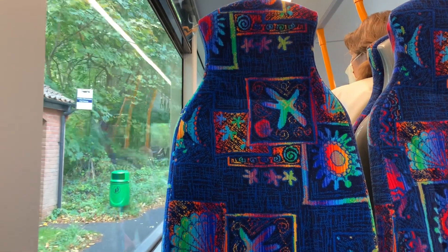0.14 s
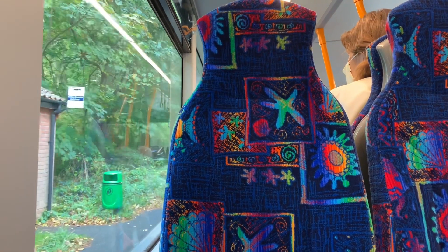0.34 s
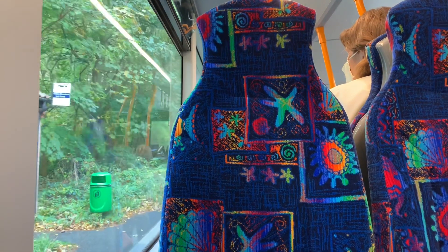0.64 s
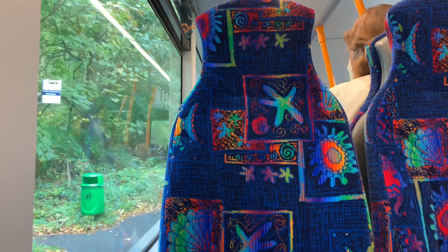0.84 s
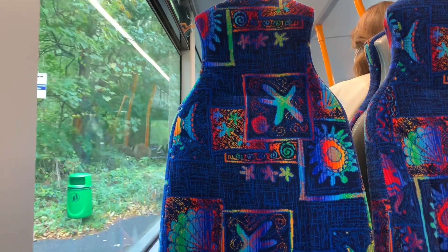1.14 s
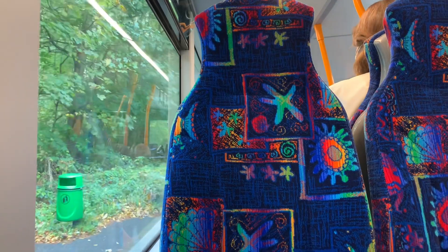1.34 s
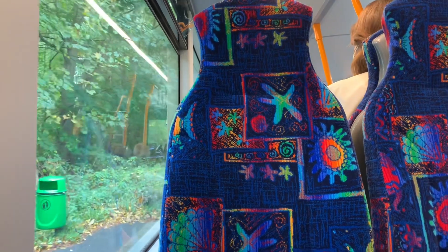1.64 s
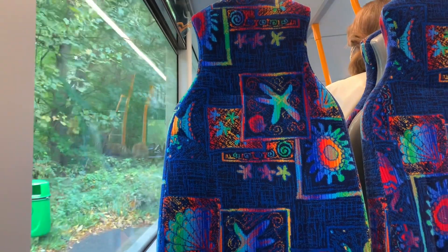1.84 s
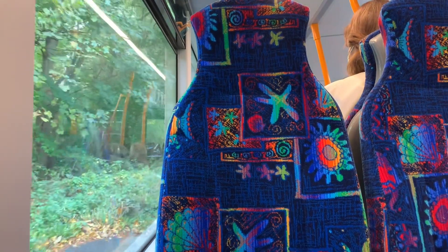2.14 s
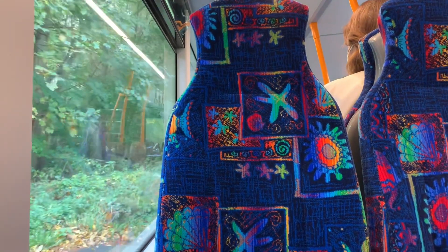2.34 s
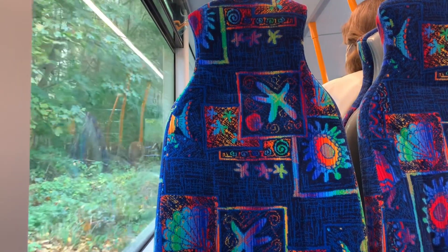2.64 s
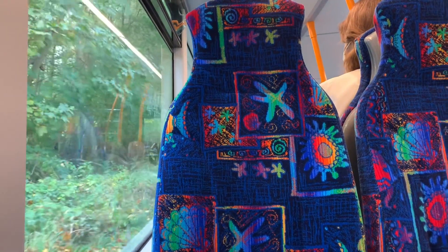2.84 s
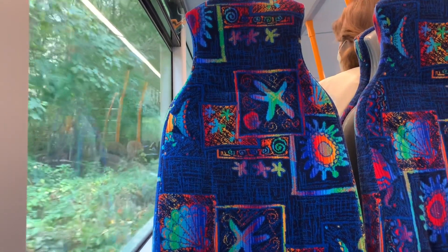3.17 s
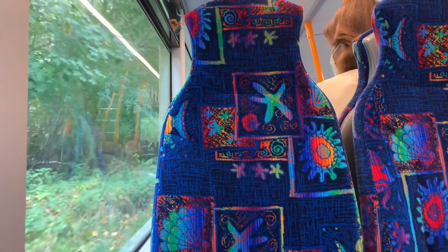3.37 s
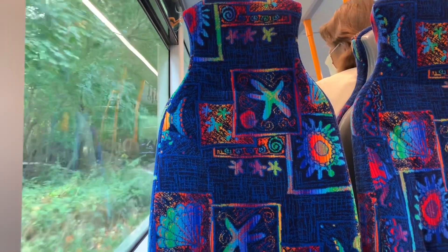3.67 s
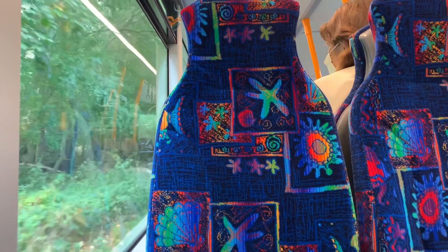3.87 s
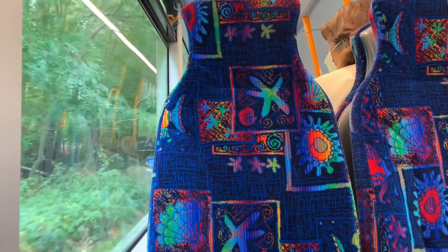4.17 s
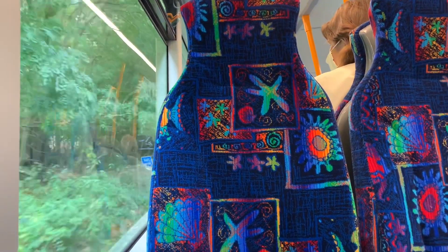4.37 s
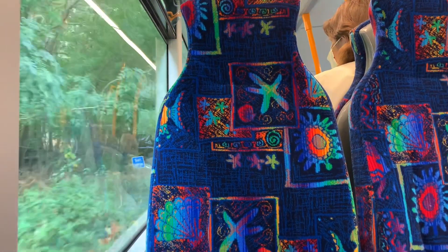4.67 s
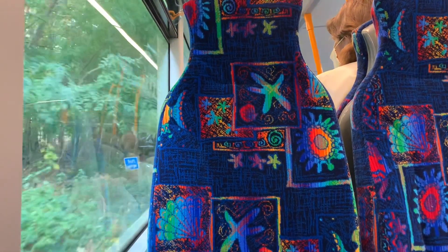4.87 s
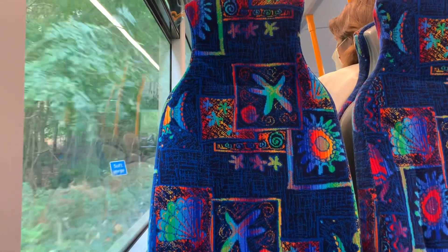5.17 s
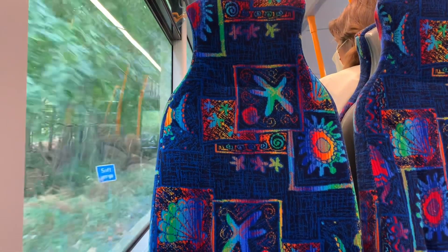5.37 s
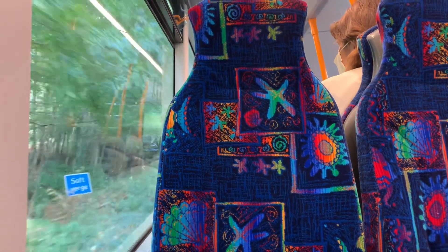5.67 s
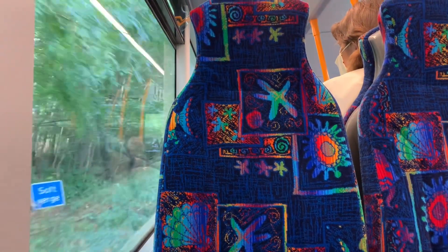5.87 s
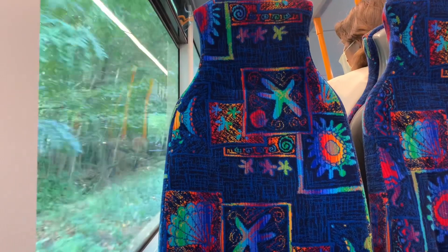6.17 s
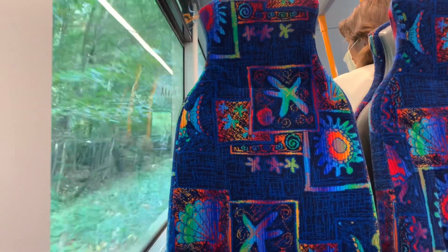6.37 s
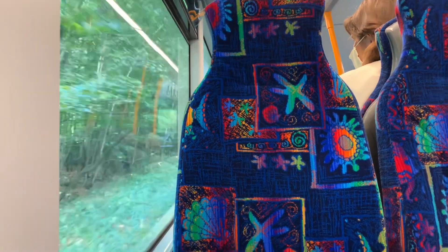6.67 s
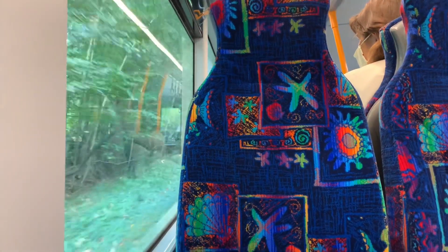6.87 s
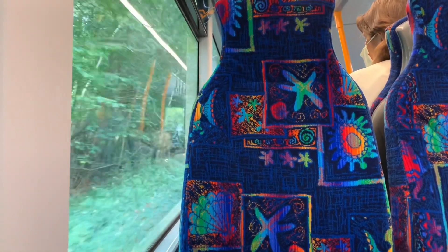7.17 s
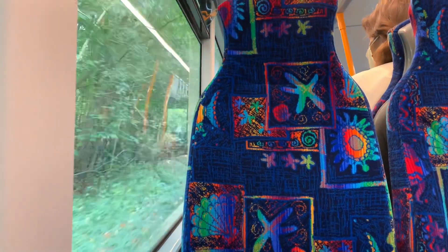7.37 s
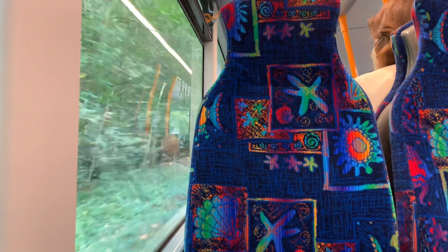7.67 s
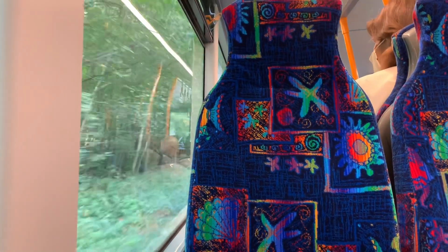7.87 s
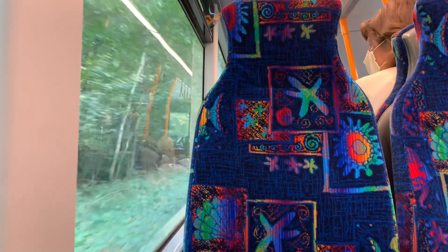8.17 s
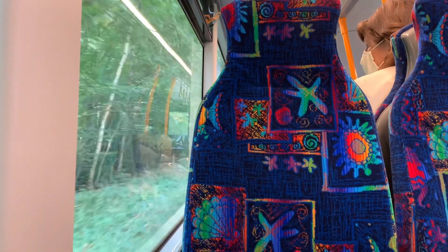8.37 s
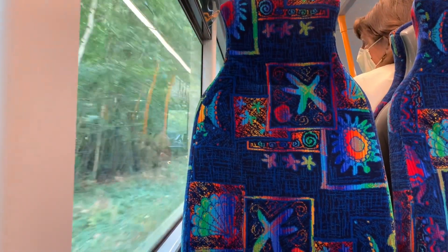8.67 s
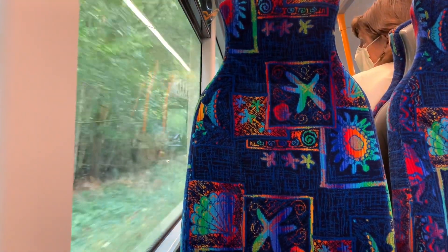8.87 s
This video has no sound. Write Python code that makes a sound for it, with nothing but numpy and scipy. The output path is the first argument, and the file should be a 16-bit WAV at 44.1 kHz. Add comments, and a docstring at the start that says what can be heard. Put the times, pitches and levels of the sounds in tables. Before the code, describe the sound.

Heard from a seat inside a bus pulling away along a wooded road. A deep diesel throb dominates, climbing for three seconds, sagging at a gear change, then rising and dipping twice more. Body rumble and soft block clatter surround it, while loose trim ticks and rattles. Faint air hiss, fan whine and a thin belt squeal sit on top; gear whine joins later. Close stereo microphone in the cabin.

```python
"""A low diesel throb, body rumble and block clatter fill a bus cabin as it pulls away and changes up.
Firing and shaft orders are drifting sines; rumble, tyre roar, clatter and air hiss are shaped noise,
the high hiss puffing with the crankshaft. A fan motor whines and narrow squeaks flare from the start;
trim rattles (noise bursts and struck modes), floor notes, a belt squeal and a creak join in,
then axle and gearbox whine as wavering sines."""
import sys
import numpy as np
from scipy import signal
from scipy.fft import rfft, irfft
from scipy.io import wavfile
from scipy.ndimage import uniform_filter1d

SR = 44100
rng = np.random.default_rng(int(sys.argv[2]) if len(sys.argv) > 2 else 0)


def store_wav(level_fs):
    """Save 16-bit WAV to argv[1]."""
    pcm = np.round(np.clip(np.atleast_2d(level_fs), -1, 1) * 32767)
    wavfile.write(sys.argv[1], SR, pcm.T.astype(np.int16))


N = 397782


def from_db(db):
    """Decibels to gain."""
    return 10 ** (np.asarray(db) / 20)


def rms_one(x):
    """Scale to unit rms."""
    return x / np.sqrt(np.mean(x ** 2) + 1e-20)


def in_time(rows):
    """Columns of a table as curves, one value a sample; the time column is left out."""
    s, *columns = np.transpose(rows)
    return [np.interp(np.arange(N) / SR, s, c) for c in columns]


def during(rows, fade_s=0.063):
    """1 while a table lasts, fading to 0 beyond both ends."""
    t = np.arange(N) / SR
    inside_s = np.minimum(t - rows[0][0], rows[-1][0] - t)
    return np.clip(1 + inside_s / fade_s, 0, 1)


def at_hz(points, hz):
    """A spectrum read on a log-frequency axis."""
    table_hz, level = np.array(points).T
    return np.interp(np.log(hz), np.log(table_hz), level)


def drift(rate_hz):
    """Slow random wander of unit rms: noise through two equal low-pass poles."""
    step = 40   # drawn at every 40th sample, then joined by lines
    r = np.exp(-2 * np.pi * rate_hz * step / SR)
    noise = rng.standard_normal(N // step + 2002)
    slow = signal.lfilter([1], [1, -2 * r, r * r], noise)[2000:]
    return np.interp(np.arange(N) / step, np.arange(len(slow)), rms_one(slow))


def resonate(x, modes):
    """Parallel resonances of (pitch_hz, width_hz, level_db), signs alternating."""
    out = 0
    for k, (hz, width_hz, level_db) in enumerate(modes):
        r = np.exp(-np.pi * width_hz / SR)
        top = (1 - r * r) / 2 * np.array([1, 0, -1])
        bottom = [1, -2 * r * np.cos(2 * np.pi * hz / SR), r * r]
        out = out + (-1) ** k * from_db(level_db) * signal.lfilter(top, bottom, x)
    return out


def cabin_modes(ripple_db, spacing_hz):
    """The many overlapping modes of the cabin: a fine, uneven ripple over frequency."""
    hz = np.fft.rfftfreq(N, 1 / SR)
    heights = rng.standard_normal(3000)
    return from_db(ripple_db * np.interp(hz / spacing_hz, np.arange(len(heights)), heights))


def coloured(spectrum, likeness, patchy_db):
    """Stereo noise of a given spectrum and likeness, flickering band by band; rms 1."""
    hz = np.maximum(np.fft.rfftfreq(N, 1 / SR), 1)
    alike = np.clip(at_hz(likeness, hz), 0, 1)
    mid, side = rfft(rng.standard_normal((2, N))) * cabin_modes(ripple_db=1.3, spacing_hz=25)
    pair = np.sqrt(1 + alike) * mid + np.sqrt(1 - alike) * side * [[1], [-1]]
    pair = from_db(at_hz(spectrum, hz)) * pair
    edges = np.log(np.geomspace(spectrum[0][0], spectrum[-1][0], num=6))
    out = 0
    for k in range(len(edges)):
        # overlapping triangular bands, each with its own flicker
        share = np.interp(np.log(hz), edges, np.arange(len(edges)) == k, left=0, right=0)
        out = out + from_db(patchy_db * drift(13.1)) * irfft(pair * share, N)
    return rms_one(out)


def orders(turns, multiples, levels_db, waver_db, waver_hz):
    """Sines at multiples of a rotation, each swelling on its own."""
    out = 0
    for k, level_db in zip(multiples, levels_db):
        sine = np.sin(2 * np.pi * (k * turns + rng.random()))
        out = out + np.sqrt(2) * from_db(level_db + waver_db * drift(waver_hz)) * sine
    return out


def whine(rows, waver_db, pitch_waver_hz, level_rate_hz):
    """A meshing, rotating or humming part: one sine whose pitch and level waver."""
    hz, level_db = in_time(rows)
    turns = np.cumsum(hz + pitch_waver_hz * drift(5.76)) / SR
    gain = from_db(level_db + 2.0 + waver_db * drift(level_rate_hz))
    return during(rows) * gain * np.sin(2 * np.pi * turns)


# Engine speed through the gear changes: time_s [s], firing_rate [firings per s]
ENGINE_SPEED = [(0, 37.5), (.6, 33.4), (1, 35.5), (1.5, 36), (1.85, 40.3), (2.08, 46.2), (2.25, 46.2),
                (3, 57), (3.25, 58.8), (3.5, 54.8), (3.9, 46.6), (4.25, 44.4), (4.75, 45.8), (5.25, 51.1),
                (5.5, 50.1), (6, 45.6), (6.25, 44.3), (7, 49.4), (8, 55.1), (8.3, 56.6), (8.5, 53.3),
                (9.02, 42.5)]


def engine_speed():
    """Firings per second, changes of speed rounded off by the flywheel."""
    flywheel_s = .15
    return uniform_filter1d(in_time(ENGINE_SPEED)[0], size=round(flywheel_s * SR), mode="nearest")


# Auxiliary shaft spinning up behind a slipping coupling: time_s [s], shaft_rate [turns per s]
SHAFT_SPIN_UP = [(0, 9), (.75, 11.6), (1, 13), (1.25, 16.2), (2.5, 27.2), (3, 31), (3.5, 33.1)]
SHAFT_RATIO = .543   # shaft turns per firing once the coupling has caught up


def shaft_speed():
    """Turns per second: the shaft spins up, then locks to the engine."""
    return np.minimum(in_time(SHAFT_SPIN_UP)[0], SHAFT_RATIO * engine_speed())


# How hard the body shakes: time_s [s], level_db [relative dB]
SHAKING_LEVEL = [(0, -18.5), (.4, -20.5), (1.6, -17.5), (2, -14), (3.1, -14), (4.5, -14.5), (5.3, -15),
                 (6.8, -16.5), (7.9, -14), (9.02, -13.5)]


def shaking_level():
    """The body's shaking in dB, shared by rumble, floor and engine orders."""
    return in_time(SHAKING_LEVEL)[0]


# Rumble spectrum: pitch_hz [Hz], level_db [relative dB per Hz]
RUMBLE_SPECTRUM = [(15, -8), (28, -12), (42, -12), (62, -11), (81, -9.5), (115, -10.5), (140, -11),
                   (185, -16), (225, -19), (270, -19), (324, -28), (400, -42), (840, -120)]
# How alike left and right hear the body: pitch_hz [Hz], likeness [0 to 1]
LEFT_RIGHT_LIKENESS = [(30, 0.78), (55, 0.95), (90, 0.92), (130, 0.8), (200, 0.72), (400, 0.48),
                       (900, 0.36), (1300, 0.5), (1700, 0.6), (2000, 0.5), (2450, 0.5), (3500, 0.35),
                       (6000, 0.25)]
# Before the wheels roll, a gain at the first mode and a lack at the second:
# pitch_hz [Hz], width_hz [Hz], level_db [dB]
STANDSTILL_MODES = [(210, 83, 1), (120, 92, -4)]


def road_rumble():
    """Low shaped noise follows the shaking; its standstill colour fades as the bus gets rolling."""
    rolling_s = 2.3
    rumble = from_db(shaking_level() - 3.5) * coloured(RUMBLE_SPECTRUM, LEFT_RIGHT_LIKENESS, patchy_db=0.5)
    standstill = np.clip(1 - np.arange(N) / SR / rolling_s, 0, 1) ** .5
    return rumble + standstill * resonate(rumble, STANDSTILL_MODES)


# Modes of the droning floor: pitch_hz [Hz], width_hz [Hz], level_db [relative dB]
FLOOR_PANELS = [(259.6, 19.4, -2), (323.5, 7, -11)]


def floor_drone(shaking):
    """Shaking noise rings the floor panels, dB for dB with the body."""
    level_db = shaking_level() - 13.5 + 1.0 * drift(0.97)
    return from_db(level_db) * rms_one(resonate(shaking, FLOOR_PANELS))


# Tyre roar level: time_s [s], level_db [relative dB]
ROAR_LEVEL = [(0, -38.5), (1.3, -36.5), (2.8, -35), (3.1, -32), (6.2, -31.5), (9.02, -30.5)]
# Tyre roar spectrum: pitch_hz [Hz], level_db [relative dB per Hz]
ROAR_SPECTRUM = [(180, -46), (300, -6), (399, -4), (497, -3), (561, -4), (690, -8.5), (762, -8.5),
                 (800, -6), (870, -19.5), (1170, -15.5), (1980, -120)]
# Wall modes stirred by the road: pitch_hz [Hz], width_hz [Hz], level_db [relative dB]
WALL_MODES = [(445, 24, -3), (488, 22, 0), (592, 20, -8), (716, 12, -3), (826, 12, -2), (940, 20, -12),
              (1590, 33, -9)]


def tyre_roar(shaking):
    """Mid-band noise plus ringing walls, growing over the ride."""
    roar = coloured(ROAR_SPECTRUM, LEFT_RIGHT_LIKENESS, patchy_db=2.0)
    walls = from_db(-5.5) * rms_one(resonate(shaking, WALL_MODES))
    return from_db(in_time(ROAR_LEVEL)[0]) * (roar + walls)


# Block clatter spectrum: pitch_hz [Hz], level_db [relative dB per Hz]
CLATTER_SPECTRUM = [(470, -29), (800, -7), (884, -4.5), (1190, -2.5), (1420, -5.5), (1950, -6), (2150, -16),
                    (2450, -7), (2530, -15.5), (2600, -10.5), (2710, -17.5), (2820, -12), (3000, -15.5),
                    (3200, -16.5), (4450, -21.5), (7000, -32), (9100, -56.5), (15400, -120)]


def block_clatter(firings):
    """Noise from the block grows with engine speed and swells slightly at each firing."""
    growth = (engine_speed() / 36.1) ** 0.69   # 1 at 36.1 firings per s
    knock = from_db(0.26 * np.cos(2 * np.pi * firings))
    noise = coloured(CLATTER_SPECTRUM, LEFT_RIGHT_LIKENESS, patchy_db=1.0)
    return from_db(-37.5) * growth * knock * noise


# Strong low orders: time_s [s], firing_db [dB], second_order_db [dB], third_order_db [dB]
FIRING_LEVELS = [(0, -32, -24.5, -47), (.6, -53, -24, -34), (1, -48, -23, -40), (1.5, -35, -26.5, -33),
                 (1.8, -29, -18.5, -29), (2.2, -14.5, -29, -36), (2.7, -33, -15, -30),
                 (3.1, -14.5, -23, -20), (3.75, -19, -16, -28), (4.1, -15.5, -21.5, -24),
                 (4.6, -14.5, -18, -34), (5.25, -17.5, -14, -23.5), (5.5, -20, -14.5, -29),
                 (6.1, -16, -18.5, -24), (7, -19.5, -12.5, -30), (7.3, -19, -15.5, -17),
                 (8.25, -14, -20.5, -28.5), (9.02, -18, -15, -27)]


def firing_tone(firings):
    """Exhaust and mount vibration at one, two and three times the firing rate."""
    return orders(firings, range(1, 4), in_time(FIRING_LEVELS), waver_db=1.2, waver_hz=3.0)


# Boom orders: multiple [of the firing rate], level_db [dB over the shaking, before the cabin]
BOOM_MULTIPLES = [(2.25, -5), (2.75, -17), (3.25, -17)]
# How the cabin booms: pitch_hz [Hz], gain_db [dB]
CABIN_BOOM = [(25, -20), (36, -10), (45, 5.5), (58, -8.5), (72, -0.5), (98, -4.5), (118, -10), (135, -2.5),
              (158, -6), (180, 1.5)]


def cabin_boom(firings):
    """Quarter orders of the firing rate swell as they pass through the cabin's resonances."""
    rate, shaking_db = engine_speed(), shaking_level()
    multiples, order_db = np.transpose(BOOM_MULTIPLES)
    levels_db = [shaking_db + db + at_hz(CABIN_BOOM, k * rate) for k, db in zip(multiples, order_db)]
    return orders(firings, multiples, levels_db, waver_db=1.8, waver_hz=2.0)


# Unequal cylinders and higher orders: multiple [of the firing rate], level_db [relative dB]
UNEVEN_ORDERS = [(.5, -25), (1.25, -19), (1.5, -14), (1.75, 8), (2.5, 0), (3.75, -2.5), (4, 3), (4.25, 3)]


def uneven_cylinders(firings):
    """Part orders from unequal cylinders, coloured by the cabin as the rumble is."""
    rate = engine_speed()
    multiples, order_db = np.transpose(UNEVEN_ORDERS)
    levels_db = [db + at_hz(RUMBLE_SPECTRUM, k * rate) for k, db in zip(multiples, order_db)]
    uneven = orders(firings, multiples, levels_db, waver_db=2.5, waver_hz=2.0)
    return from_db(shaking_level() - 9.5) * uneven


# Lowest shaft orders: time_s [s], second_order_db, third_order_db, fourth_order_db [dB],
# hiss_flutter_db [dB, scaled by each sound that uses it]
SHAFT_LEVELS = [(0, -55, -56, -47, -1), (.4, -50, -50, -27, -1), (.75, -45, -45, -22, 1),
                (1.15, -34, -33, -29, -2), (1.8, -25, -23, -38, 2), (2.3, -23, -27, -21, 2),
                (2.8, -29, -20.5, -27, 1.5), (3.4, -38, -23, -40, 1), (3.8, -33, -32, -19, -0.5),
                (4.3, -26, -33, -37, 0.5), (5.2, -32, -30, -26, 0), (5.75, -24, -27, -30, 0.5),
                (6.25, -29, -27, -37, 0.5), (6.75, -26, -25, -24, -1.5), (7.25, -23, -23, -32, 0.5),
                (7.75, -22, -32, -37, 0.5), (8.25, -38, -31, -41, -0.5), (9.02, -24, -26, -29, 0.5)]
# Higher shaft orders: multiple [of the shaft speed], level_db [dB over the shaking, before the floor]
HIGH_SHAFT_ORDERS = [(5, -15), (6, -15), (8, -14), (9, -13), (10, -17), (11, -17), (12, -10)]
# What the floor lets through, best near its own note: pitch_hz [Hz], gain_db [dB]
FLOOR_PASS = [(120, -2), (175, -3), (200, -20), (225, -16), (240, -6), (256, 0), (270, 0), (285, -10),
              (300, -18)]


def shaft_hum(shaft):
    """Low shaft orders hum; higher ones come through the floor and sink while the coupling slips."""
    turn_rate, shaking_db = shaft_speed(), shaking_level()
    low = orders(shaft, range(2, 5), in_time(SHAFT_LEVELS), waver_db=1.5, waver_hz=2.6)
    slip_db = 40 * (1 - turn_rate / (SHAFT_RATIO * engine_speed()))   # 40 dB down at full slip
    multiples, order_db = np.transpose(HIGH_SHAFT_ORDERS)
    levels_db = [shaking_db - slip_db + db + at_hz(FLOOR_PASS, k * turn_rate)
                 for k, db in zip(multiples, order_db)]
    return low + orders(shaft, multiples, levels_db, waver_db=2.5, waver_hz=1.0)


def shaft_flutter(shaft):
    """Once-per-turn level flutter in dB, shared by the hiss and the belt."""
    return in_time(SHAFT_LEVELS)[3] * np.cos(2 * np.pi * (shaft - .06))


# Air leak: time_s [s], low_hiss_db [relative dB], high_hiss_db [relative dB], high_puff_depth_db [dB]
AIR_LEVELS = [(0, -57, -70, -4), (.3, -65.5, -87, -4), (1.1, -57, -66, -2), (1.6, -58.5, -66, -2),
              (1.9, -51, -58, -1), (2.6, -48.5, -54, 0), (3.05, -47, -50, -1), (3.3, -50, -52, 1),
              (4.05, -58, -56, 3), (4.65, -53.5, -54, 1), (5, -54, -50, 2), (5.75, -53.5, -48, 0.3),
              (6, -54, -50, 3), (6.7, -57, -52, -1), (7.4, -57, -55, 0), (7.75, -52.5, -48, 1),
              (8.5, -57, -52, 0), (9.02, -56, -56, 3)]
# Low hiss spectrum: pitch_hz [Hz], level_db [relative dB per Hz]
LOW_HISS_SPECTRUM = [(5500, 3.5), (7000, -2), (8500, 3), (10000, -1), (11500, -6), (12500, -38.5)]
# High hiss spectrum: pitch_hz [Hz], level_db [relative dB per Hz]
HIGH_HISS_SPECTRUM = [(11000, -59), (12300, 22), (13500, 8), (14800, 16.5), (16000, -5)]


def air_leak(firings, shaft):
    """Two bands of hiss flutter with the shaft; the high one puffs once per four-firing engine cycle."""
    low_db, high_db, puff_depth_db = in_time(AIR_LEVELS)
    puff_db = puff_depth_db * np.cos(2 * np.pi * (firings / 4 + .08))
    flutter_db = shaft_flutter(shaft)
    # pitch in Hz, left-right likeness
    alike = [(6000, .4), (9000, .75), (10300, .72), (11700, .9), (13000, .82), (15000, .75)]
    low = from_db(low_db + flutter_db) * coloured(LOW_HISS_SPECTRUM, alike, patchy_db=3.0)
    high_db = high_db - 1 + .6 * flutter_db + puff_db
    return low + from_db(high_db) * coloured(HIGH_HISS_SPECTRUM, alike, patchy_db=3.0)


# Fan motor: time_s [s], pitch_hz [Hz], level_db [relative dB]
FAN_WHINE = [(0, 2440, -51), (3, 2443, -50), (3.7, 2443, -48.5), (4.5, 2446, -47.5), (4.95, 2455, -47),
             (5.3, 2465, -53), (7, 2472, -55), (9.02, 2465, -56)]


def fan_motor():
    """A rotating motor's steady whine with quick waver."""
    return whine(FAN_WHINE, waver_db=3.5, pitch_waver_hz=6.0, level_rate_hz=21.0)


# Narrow notes of seats and trim: pitch_hz [Hz], width_hz [Hz], level_db [relative dB]
SQUEAK_NOTES = [(691, 21, -51), (1117, 39, -56.5), (1600, 40, -55), (1785, 34, -54), (1930, 29, -55.5),
                (2027, 35, -56), (2160, 34, -59)]


def squeaks():
    """Noise stirs each narrow note of seats and trim, which flares on its own."""
    stir = rng.standard_normal((2, N)) + rng.standard_normal(N)   # partly shared by left and right
    out = 0
    for hz, width_hz, level_db in SQUEAK_NOTES:
        flare = from_db(level_db + 4.5 * drift(5))
        out = out + flare * rms_one(resonate(stir, [(hz, width_hz, 0)]))
    return out


# Loose trim jolts: start_s [s], level_db [relative dB], knock_db [dB over that level]
TRIM_JOLTS = [(0.6848, -34, 0.5), (0.719, -36, 6), (0.815, -34, 4.5), (1.233, -35, 5), (1.274, -35.5, 7),
              (1.336, -29, 1.5), (1.439, -25.5, 1), (2.0707, -32, -1), (2.12, -33, 0), (2.439, -35.5, 9),
              (3.015, -32.5, 6), (3.1138, -24.5, -1), (3.3494, -37, 8), (3.506, -37, 9), (3.577, -27, 1),
              (3.676, -27.5, 3), (3.766, -24.5, -3), (4.969, -36, 7.5), (5.2136, -33.5, 5),
              (5.7894, -39, 12), (6.947, -32, -9), (7.157, -31, 1), (7.6874, -35, 5), (8.2187, -38, 6)]
# Knock of the panel: pitch_hz [Hz], width_hz [Hz], level_db [relative dB]
PANEL_KNOCK = [(885, 240, 3.5), (1320, 200, 14.5), (1780, 310, 10), (2540, 1030, 1)]
# The panel rings on after the blow: pitch_hz [Hz], width_hz [Hz], level_db [relative dB]
PANEL_RING = [(930, 70, -5), (1300, 60, 0), (1550, 40, 6), (2080, 80, 1), (2480, 110, -2)]
# Tinkle of its clip: pitch_hz [Hz], width_hz [Hz], level_db [relative dB]
CLIP_TINKLE = [(4230, 400, -4), (6800, 420, 7), (9430, 1800, -10), (13800, 1600, -13)]


def rattles():
    """Each jolt strikes the panel and sets off fast-dying chatter: panel knocks and clip tinkles."""
    attack_s, t60_s, blow_s, blow_db = 0.0017, 0.16, .0004, 16
    bright, dull, blows = np.zeros((3, N))
    blow = np.hanning(round(blow_s * SR))
    for s, level_db, knock_db in TRIM_JOLTS:
        i = round(s * SR)
        t = np.arange(min(N - i, SR // 4)) / SR
        dying = from_db(level_db - 60 * t / t60_s) * np.minimum(t / attack_s, 1)
        bright[i:i + len(t)] += dying
        dull[i:i + len(t)] += dying * from_db(knock_db)
        blows[i:i + len(blow)] += from_db(level_db + knock_db + blow_db) * blow
    chatter = rng.standard_normal((2, N)) * .5 + rng.standard_normal(N) * 0.42
    chatter = chatter * from_db(2 * drift(120))   # uneven contact
    ringing = resonate(blows + 1e-18, PANEL_RING)   # the tiny offset keeps the filters from stalling
    knocks = resonate(chatter * dull * 1.43, PANEL_KNOCK) + ringing
    tinkles = resonate(chatter * bright * 1.1, CLIP_TINKLE)
    return knocks, tinkles


# The floor's one clear note: time_s [s], pitch_hz [Hz], level_db [relative dB]
CLEAR_FLOOR_NOTE = [(1.4, 258, -32), (1.65, 259, -28), (2.15, 261, -24), (2.3, 262, -43), (2.9, 252, -39),
                    (3.1, 253.5, -29), (3.4, 252.8, -27.5), (3.55, 254, -40)]


def floor_note():
    """The floor holds one clear low note, a nearly steady sine."""
    return whine(CLEAR_FLOOR_NOTE, waver_db=1.5, pitch_waver_hz=1.5, level_rate_hz=4.0)


# Belt squeal: time_s [s], level_db [relative dB]
SQUEAL_LEVEL = [(1.6, -68), (1.9, -57.5), (2.8, -49), (3.2, -54.5), (4.6, -62.5), (4.95, -50), (5.7, -48.5),
                (6.9, -58), (7.6, -52.5), (9.02, -51)]
# Belt modes: pitch_hz [Hz], width_hz [Hz], level_db [relative dB]
BELT_MODES = [(9440, 150, -12), (9860, 50, -8), (10300, 60, 0), (10350, 400, -11), (10600, 70, -6)]


def belt_squeal(firings, shaft):
    """Noise in narrow belt modes flutters with the shaft, and after spin-up throbs each engine cycle."""
    squeal = rms_one(resonate(rng.standard_normal(N), BELT_MODES))
    throb_db = 1.9 * np.cos(2 * np.pi * (firings / 4 - .36)) * (1 - during(SHAFT_SPIN_UP))
    throb_db = throb_db + 2.93 * shaft_flutter(shaft) + 2.3 * drift(5.8)
    return squeal * during(SQUEAL_LEVEL) * from_db(in_time(SQUEAL_LEVEL)[0] + throb_db)


# A panel creaks: time_s [s], level_db [relative dB]
CREAK_LEVEL = [(2.97, -58), (3.01, -40), (3.07, -29.5), (3.13, -48), (3.17, -55)]
# Modes of that panel: pitch_hz [Hz], width_hz [Hz], level_db [relative dB]
CREAK_PANEL = [(566, 70, -5), (818, 60, 1), (1180, 60, -3), (1510, 150, -6), (1780, 60, -5), (2250, 30, -1)]


def creak():
    """Rubbing noise in a few narrow panel modes."""
    rubbing = rms_one(resonate(rng.standard_normal(N), CREAK_PANEL))
    return from_db(in_time(CREAK_LEVEL)[0]) * during(CREAK_LEVEL) * rubbing


# A wavering hum in the floor: time_s [s], pitch_hz [Hz], level_db [relative dB]
WAVERING_HUM = [(3.6, 490, -48), (4.3, 488, -40), (4.7, 500.7, -38.5), (5.15, 502.6, -43.5),
                (5.3, 489, -29), (5.5, 470.6, -35.5), (5.7, 500.5, -44), (6.2, 484, -40.5),
                (7.3, 515.6, -41), (7.5, 502, -48), (8.6, 500, -48), (8.8, 492, -30.5), (9.02, 484, -41)]


def wavering_hum():
    """A floor hum as a sine whose pitch wanders and level surges."""
    return whine(WAVERING_HUM, waver_db=4.5, pitch_waver_hz=6.14, level_rate_hz=11.0)


# Axle gear whine: time_s [s], level_db [relative dB]
AXLE_WHINE = [(5.75, -50), (6.02, -38), (6.14, -27), (6.3, -30), (6.45, -37), (6.8, -39), (7.05, -38),
              (7.25, -55), (8.1, -52), (8.5, -46), (9.02, -45)]


def axle_gears():
    """Meshing axle gears whine, climbing steadily with road speed."""
    start_hz, rise_hz_per_s = 497, 71
    rows = [(s, start_hz + rise_hz_per_s * (s - AXLE_WHINE[0][0]), db) for s, db in AXLE_WHINE]
    return whine(rows, waver_db=2.5, pitch_waver_hz=5.0, level_rate_hz=10.0)


# Gearbox whine: time_s [s], pitch_hz [Hz], level_db [relative dB]
GEARBOX_WHINE = [(7, 1930, -56), (7.4, 2025, -52), (7.75, 2100, -52), (8.2, 2190, -49)]


def gearbox():
    """Meshing gears whine upward in pitch."""
    return whine(GEARBOX_WHINE, waver_db=4.0, pitch_waver_hz=2.4, level_rate_hz=11.0)


def ports(pair, lead, balance):
    """Two microphone ports apart: a phase lead and a level balance between left and right."""
    margin = 2048
    padded = np.pad(pair, ((0, 0), (margin, margin)), "reflect")   # the sound runs on past both ends
    hz = np.fft.rfftfreq(padded.shape[1], 1 / SR)
    phase = np.interp(hz, *np.transpose(lead))
    turn = from_db(at_hz(balance, hz + 1) / 2) * np.exp(.5j * phase)   # half to each side
    return irfft(rfft(padded) * [turn, 1 / turn], padded.shape[1])[:, margin:margin + N]


# Left port's lead for sound from the body: pitch_hz [Hz], lead [radians]
BODY_PORT_LEAD = [(0, 0), (300, .15), (500, 1), (850, 1.6), (1200, 3.3), (1750, 3.6), (2200, 6.3),
                  (2900, 8.4), (4500, 12.6), (22050, 62)]
# Left over right for the body: pitch_hz [Hz], balance_db [dB]
BODY_PORT_BALANCE = [(60, -.2), (130, .3), (250, 2.5), (480, -1), (800, 2.2), (2000, .8), (5000, -1.5)]
# Left port's lead for the bright sounds: pitch_hz [Hz], lead [radians]
BRIGHT_PORT_LEAD = [(0, 0), (4820, 6.5), (7490, 2.9), (8440, .9), (9650, -.5), (10300, -1.9), (11100, -3),
                    (12300, -3.6), (13200, -5.8), (14500, -6.6), (15400, -8.6)]


def scene():
    """Low and middle sounds reach the ports with one lead and balance, the bright ones with another."""
    firings = np.cumsum(engine_speed()) / SR
    shaft = np.cumsum(shaft_speed()) / SR
    # (Hz, relative dB): nearly flat noise that stirs floor and walls
    shaking = coloured([(150, 0.0075), (2000, 0.007)], LEFT_RIGHT_LIKENESS, patchy_db=3.0)
    body = road_rumble() + floor_drone(shaking) + tyre_roar(shaking) + block_clatter(firings)
    engine = firing_tone(firings) + cabin_boom(firings) + uneven_cylinders(firings) + shaft_hum(shaft)
    whines = fan_motor() + floor_note() + wavering_hum() + axle_gears() + gearbox()
    knocks, tinkles = rattles()
    low = body + engine + whines + squeaks() + knocks + creak()
    bright = air_leak(firings, shaft) + tinkles + belt_squeal(firings, shaft)
    bright = ports(bright, BRIGHT_PORT_LEAD, [(5000, -1.5), (8000, 0)])   # balance: Hz, dB
    return ports(low, BODY_PORT_LEAD, BODY_PORT_BALANCE) + bright


def record(dry):
    """The microphone drops the deepest rumble, peaks are rounded, the top is cut."""
    rumble_cut_hz, top_cut_hz = 29.6, 15950
    thinned = signal.sosfilt(signal.butter(2, rumble_cut_hz, "high", fs=SR, output="sos"), dry)
    rounded = 1.521 * np.tanh(thinned / 1.518)
    return signal.sosfilt(signal.cheby2(20, 60, top_cut_hz, fs=SR, output="sos"), rounded)


dry = scene()
out = record(dry)
store_wav(out)
```